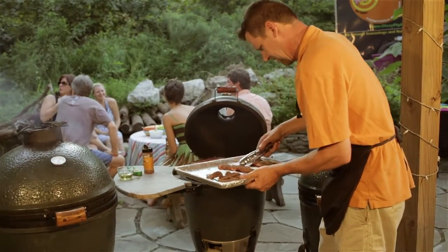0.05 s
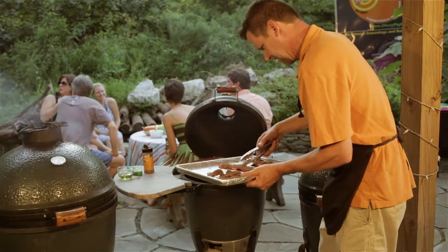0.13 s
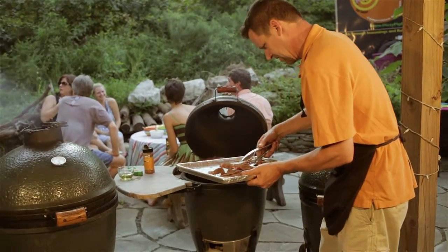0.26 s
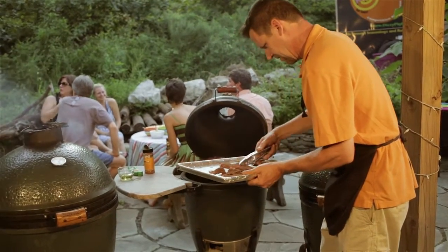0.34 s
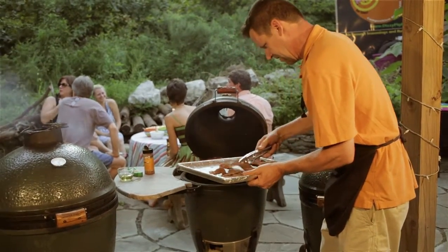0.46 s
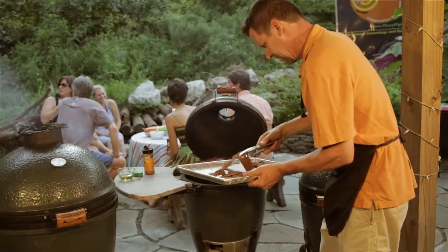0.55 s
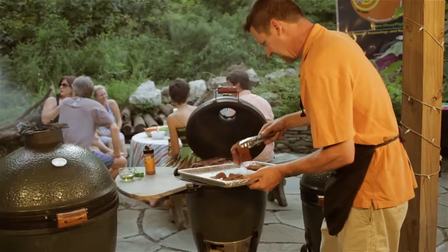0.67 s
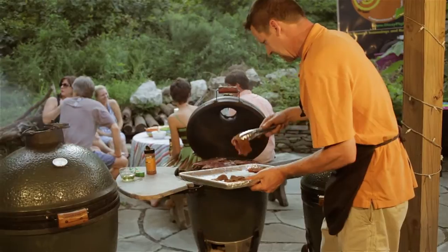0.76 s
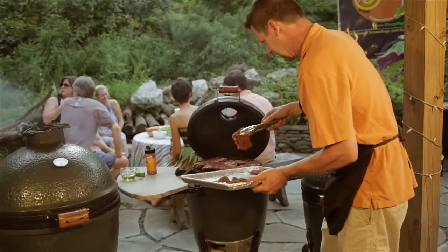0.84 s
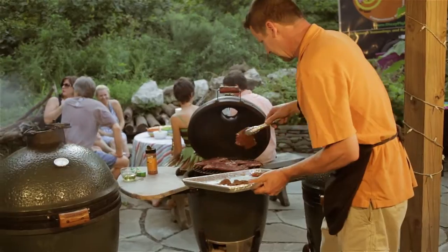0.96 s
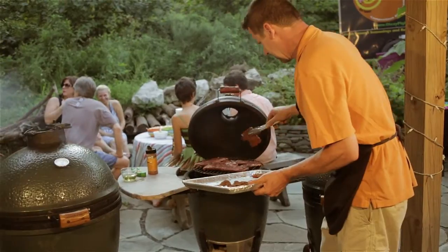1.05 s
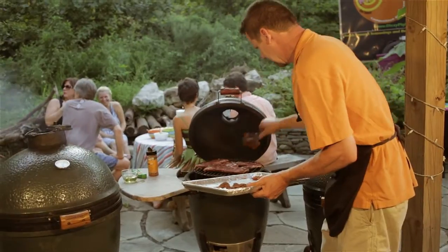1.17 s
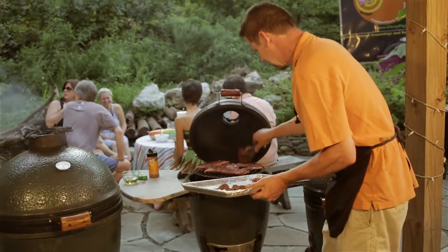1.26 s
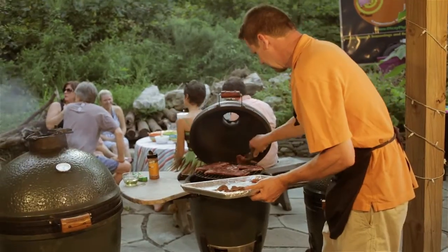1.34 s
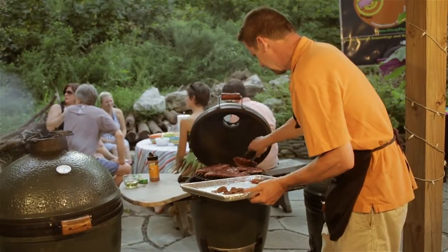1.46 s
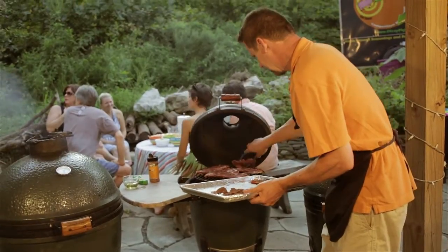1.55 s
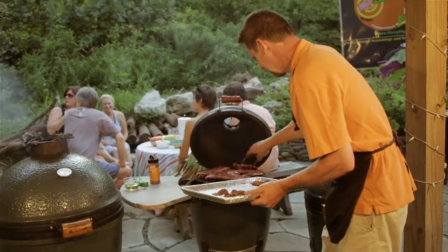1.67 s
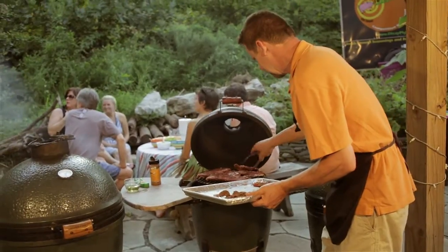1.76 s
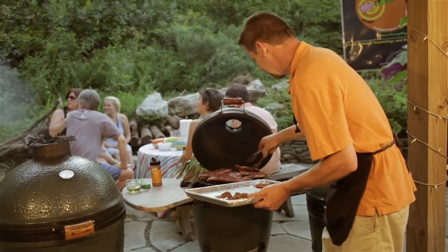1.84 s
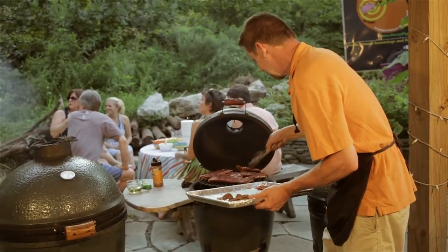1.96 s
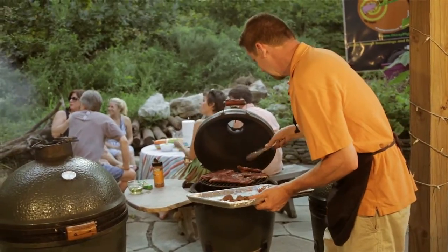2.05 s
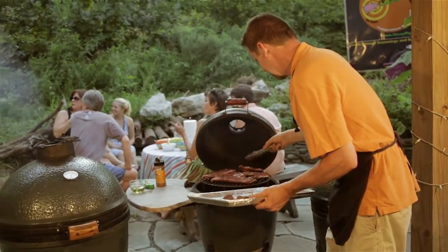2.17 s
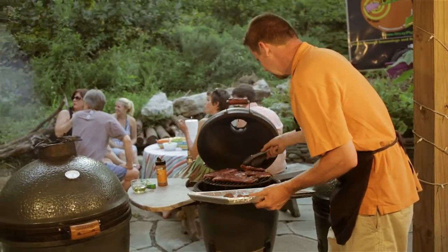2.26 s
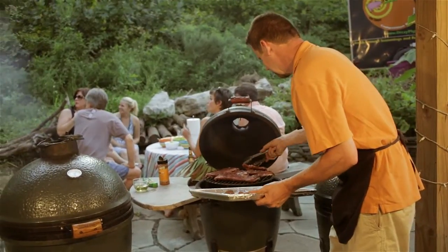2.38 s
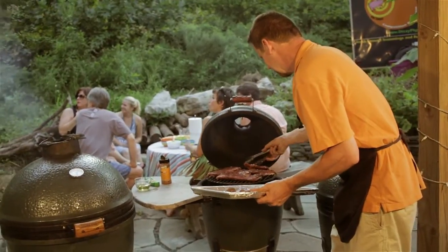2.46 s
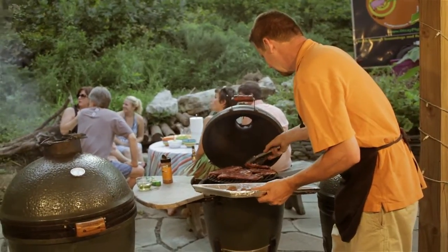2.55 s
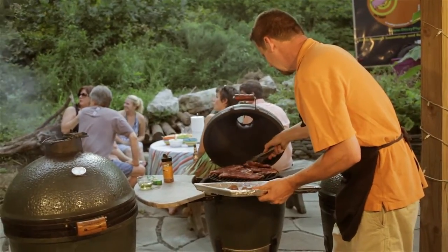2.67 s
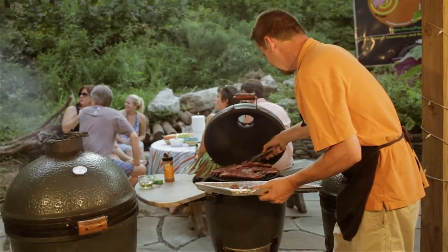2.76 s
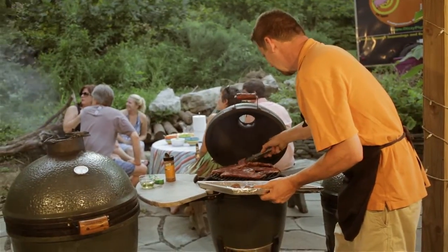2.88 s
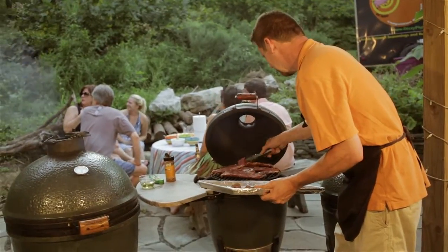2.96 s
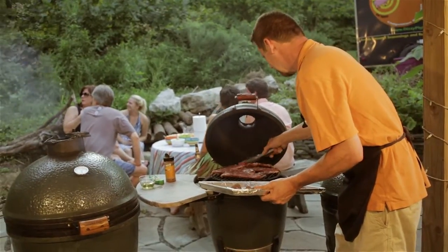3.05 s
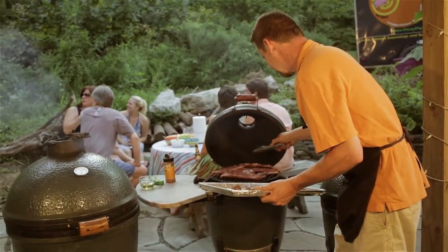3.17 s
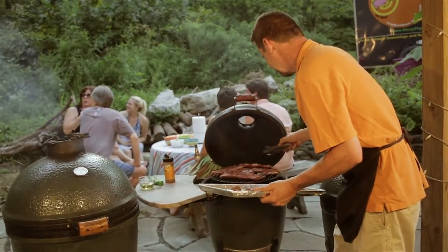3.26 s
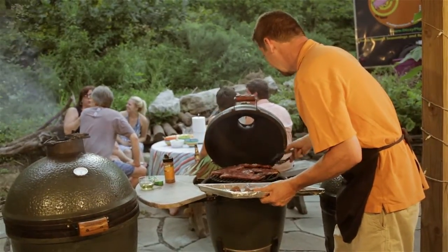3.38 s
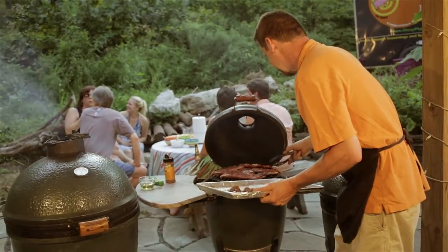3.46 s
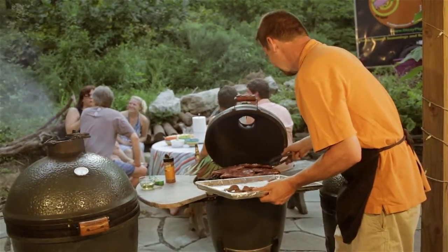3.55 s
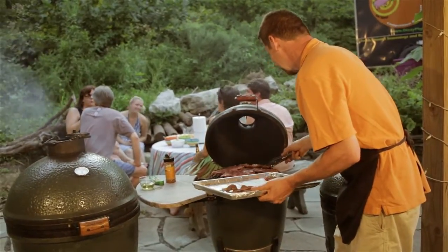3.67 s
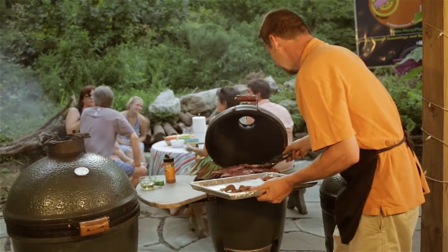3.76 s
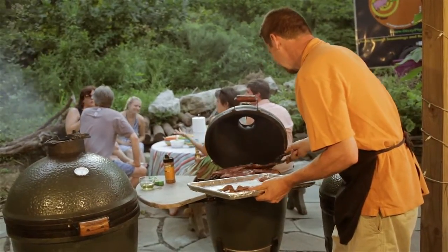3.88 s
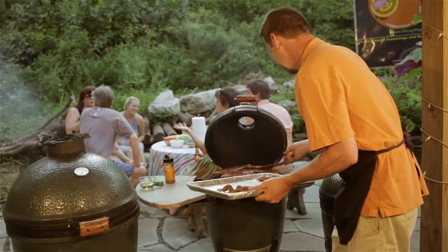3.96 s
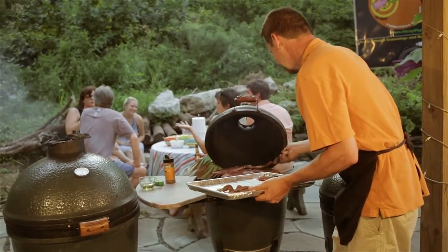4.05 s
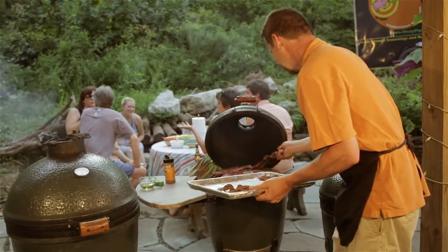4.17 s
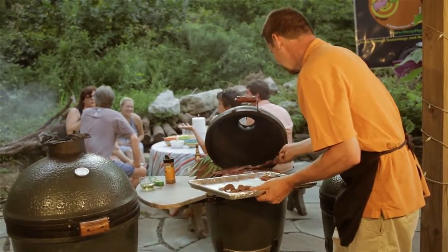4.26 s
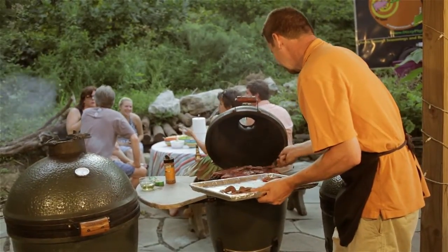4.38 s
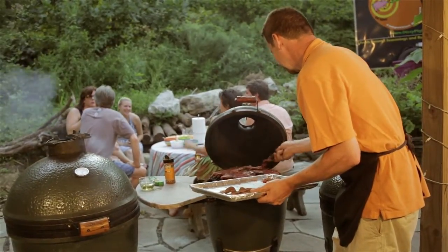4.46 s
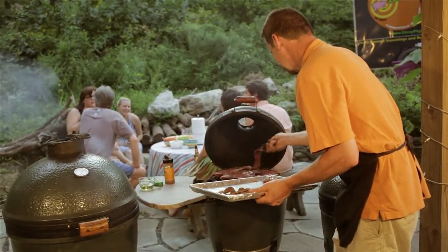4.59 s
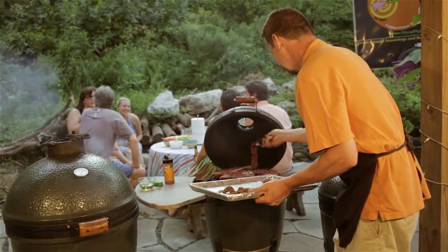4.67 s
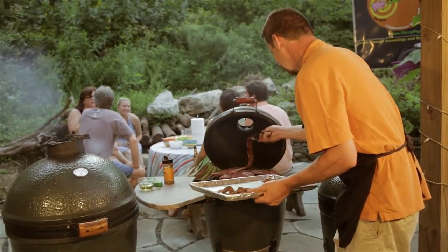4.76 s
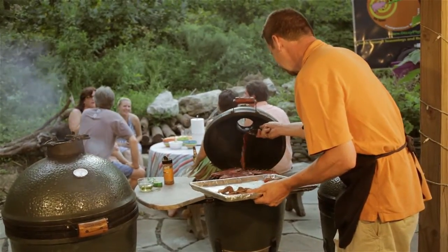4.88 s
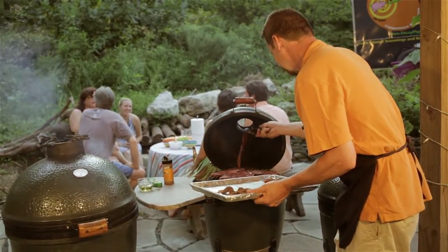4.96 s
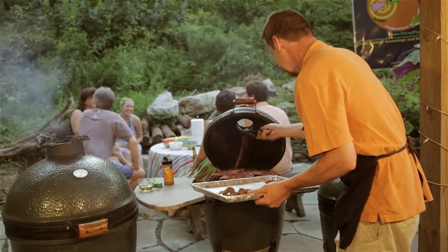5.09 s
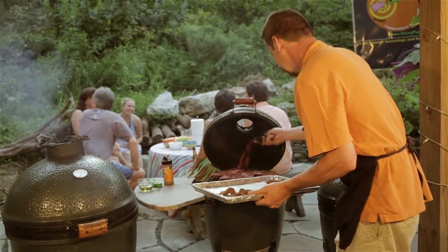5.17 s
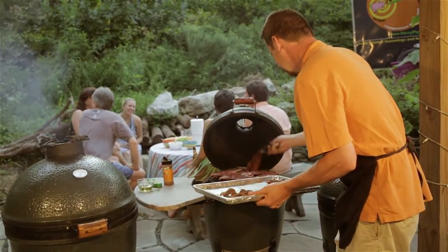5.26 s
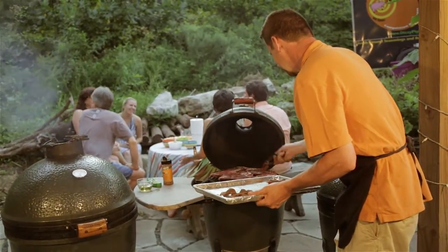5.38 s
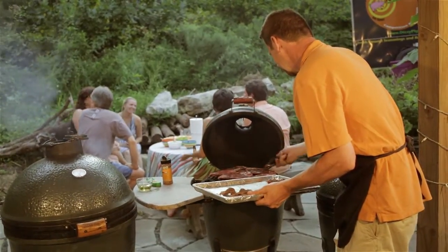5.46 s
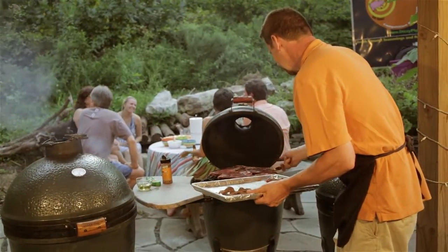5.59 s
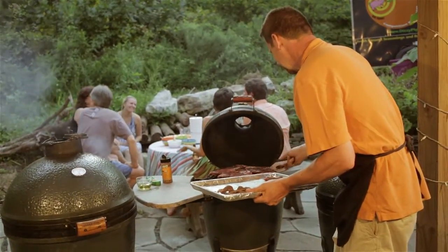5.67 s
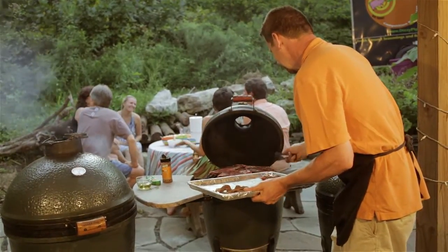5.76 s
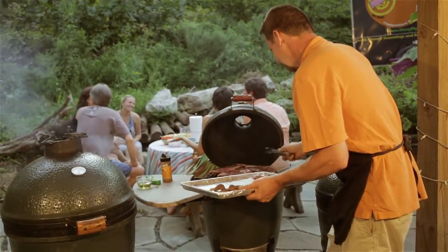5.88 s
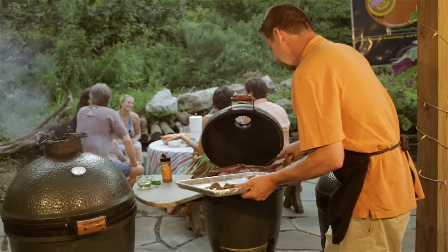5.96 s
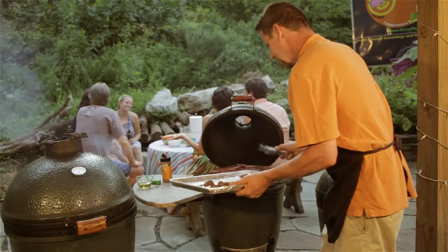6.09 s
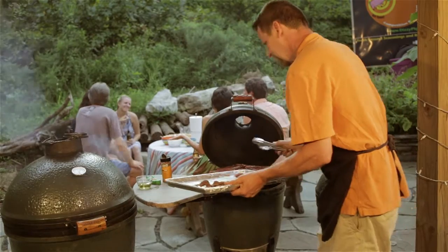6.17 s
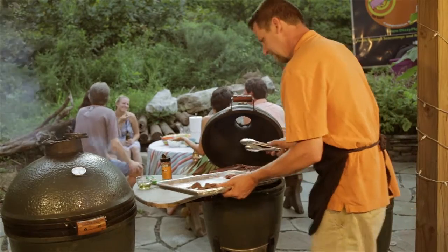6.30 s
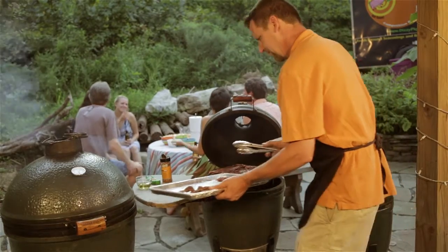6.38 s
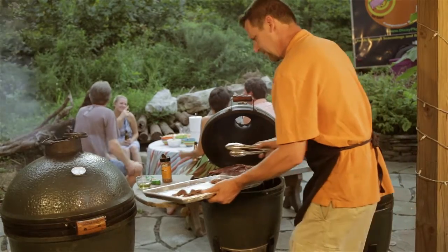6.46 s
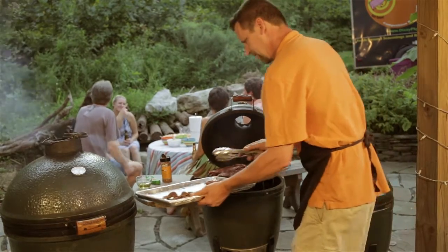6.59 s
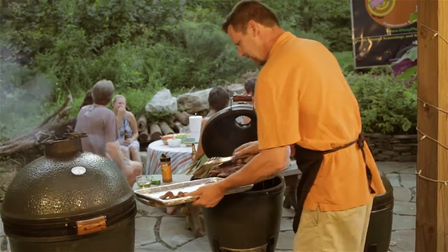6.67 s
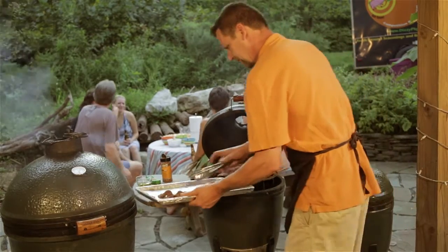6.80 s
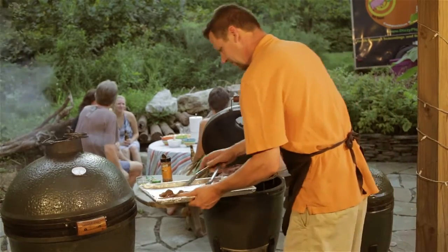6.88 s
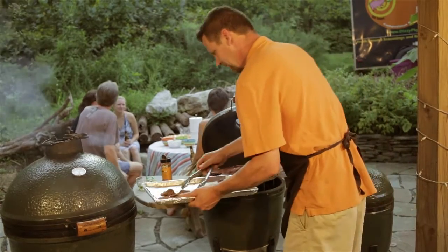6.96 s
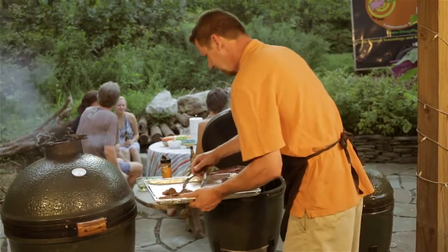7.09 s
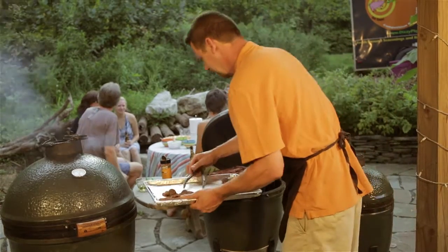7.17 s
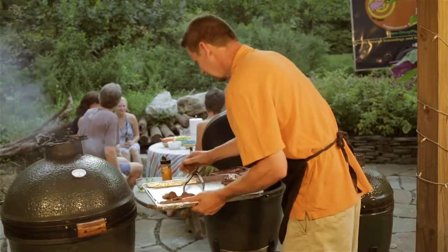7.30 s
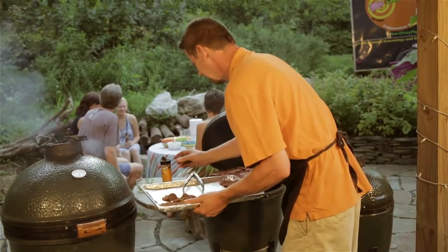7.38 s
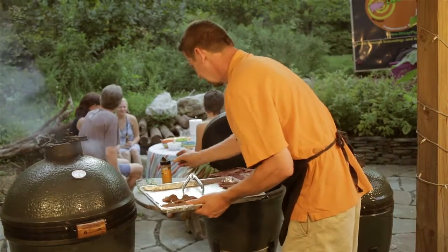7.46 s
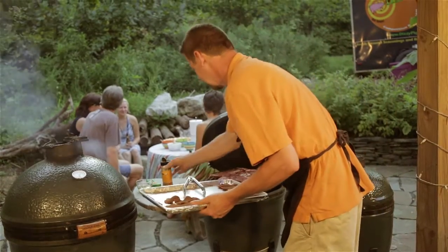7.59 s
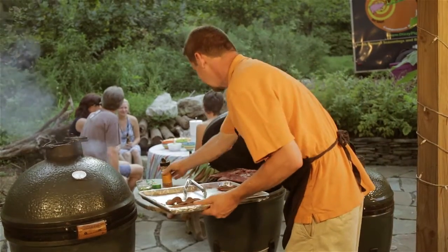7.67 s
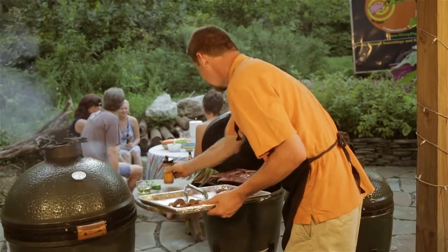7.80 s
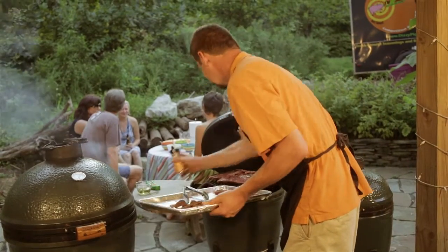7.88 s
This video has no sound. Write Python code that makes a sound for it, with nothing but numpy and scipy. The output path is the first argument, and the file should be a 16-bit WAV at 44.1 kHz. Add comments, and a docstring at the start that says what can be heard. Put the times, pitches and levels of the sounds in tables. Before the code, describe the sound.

At 0.1 s steel tongs strike a sheet tray damped by meat: a short, hollow clack with one quick rebound. From then on meat sizzles softly, a bright hiss with crackle, swelling near 1.6 and 3 s; sharper fat spits pop around 2.2, 2.9, 3.0 and 5.5 s. Between 1.3 and 5 s the tongs and meat touch the grate faintly, with small scuffs and dull hollow bumps, clearest near 1.65 and 2.4 s. A scuffing click at 5.7 s precedes a stronger steel click at 6.0 s. Cloth rustles faintly at 6.65 s, then the tray clatters loudly at 6.9-7.1 s in fast rebounds and again, brighter and ringing, at 7.26-7.35 s. A faint rustle and tap follow at 7.7 s. Quiet garden rumble, insects near 7 kHz and an intermittent breathy whistle near 1.7 kHz lie behind. Close, open-air, mono.

```python
"""Steel tongs hit a meat-damped sheet tray, then click and scuff on a charcoal grill's grate; the tray clatters again.
Tray, tongs, grate and grill hollow are struck banks of decaying sines, with noise bursts for cracks and scuffs.
Meat sizzles and spits: steady noise with random pops, and short noise bursts. A sleeve rustles in noise swells.
Behind lie a low garden rumble of coloured noise, insects trilling in narrow noise bands,
and a thin whistle of resonant noise that comes and goes with hiss around it."""
import sys
import numpy as np
from scipy import signal
from scipy.fft import rfft, irfft, next_fast_len
from scipy.io import wavfile

SR = 44100
rng = np.random.default_rng(int(sys.argv[2]) if len(sys.argv) > 2 else 0)


def store_wav(level_fs):
    """Save 16-bit WAV to argv[1]."""
    pcm = np.round(np.clip(np.atleast_2d(level_fs), -1, 1) * 32767)
    wavfile.write(sys.argv[1], SR, pcm.T.astype(np.int16))


N = 349933  # samples

# Tongs on the tray: start_s [s], tray_db [dB before the spot weighting], spot_hz [pitch the spot favours, Hz],
# spread [octaves], crack_db [dB], ring_db [tong ring, dB], count [rebounds, rounded], gap_s [s between rebounds]
TRAY_BLOWS = [ (0.1096, -9, 461, 0.062, -26, -49.5, 0.5, 0), (6.724, -37, 447, 0.15, -53, -78, 0, 0),
              (6.93, -12.5, 810, 0.27, -23, -41, 2.5, .009),
              (6.972, -14.5, 730, 0.4, -26.5, -52, 5.5, .0101), (7.055, -20, 520, 1.1, -36, -56, 0, 0),
              (7.0787, -18, 600, 0.23, -38, -52, 2.5, .0147), (7.261, -13, 500, 0.36, -21, -28.5, 0.5, 0),
              (7.27, -10.5, 480, 1.5, -12.5, -48.5, 1.5, .0194), (7.297, -20.5, 650, 1.3, -22, -35, 0, 0),
              (7.311, -27, 580, 0.9, -38, -33.5, 3, .0135), (7.756, -39, 278, 0.65, -57, -72, 0.5, 0)]
# Dull colour of the grill's shudder and the garden's scatter: pitch_hz [Hz], level_db [relative dB per Hz]
DULL_COLOUR = [(30, -17), (70, -9), (140, 3), (290, 12), (520, -2), (950, 3.5), (1700, -11), (2600, -37),
               (16000, -50)]
# Bright colour of frying fat: pitch_hz [Hz], level_db [relative dB per Hz]
FRYING_COLOUR = [(300, -3), (2000, -20), (3700, -16), (5200, -4), (6500, -3), (8800, -3), (12000, -1),
                 (14500, -1.5), (16000, -3)]


def from_db(db):
    """Decibels to gain."""
    return 10 ** (np.asarray(db) / 20)


def rms_one(x):
    """Scale to unit power."""
    return x / np.sqrt(np.mean(x ** 2) + 1e-20)


def in_time(rows):
    """Join (time, value) points by straight lines into a control curve at every sample."""
    return np.interp(np.arange(N) / SR, *np.transpose(rows))


def drift(rate_hz):
    """Slow random wandering with rms 1: noise with its faster changes rolled off above the rate."""
    hz = np.arange(N // 2 + 1) * SR / N
    slowed = rfft(rng.standard_normal(N)) / (1 + (hz / rate_hz) ** 2)
    return rms_one(irfft(slowed, N))


def colour(x, spectrum):
    """Give a steady signal a spectrum, drawn over log frequency; rms 1."""
    size = next_fast_len(N)
    hz, db = np.transpose(spectrum)
    bins_hz = np.maximum(np.arange(size // 2 + 1) * SR / size, 1)
    gain = from_db(np.interp(np.log(bins_hz), np.log(hz), db))
    return rms_one(irfft(rfft(x, size) * gain, size)[:N])


def clicks(times, db):
    """One impulse for each contact."""
    out = np.zeros(N)
    np.add.at(out, np.round(times * SR).astype(int), from_db(db))
    return out


def ring(drive, hz, t60):
    """A two-pole resonator: a unit click sets a sine of height 1 ringing, down 60 dB after t60 seconds."""
    radius = from_db(-60 / (t60 * SR))
    angle = 2 * np.pi * hz / SR
    # the tiny offset keeps the dying filter state from becoming vanishingly small
    return signal.lfilter([0, np.sin(angle)], [1, -2 * radius * np.cos(angle), radius ** 2], drive + 1e-18)


def fade(drive, t60):
    """An envelope that jumps at each click and dies away by 60 dB in t60 seconds."""
    return signal.lfilter([1], [1, -from_db(-60 / (t60 * SR))], drive + 1e-18)


def burst(drive, spectrum, t60, tail_db, tail_t60, rise_t60=0.0011):
    """A crowd of unresolved modes, as noise: a quick crack and a weaker, longer tail."""
    envelope = fade(drive, t60) + from_db(tail_db) * fade(drive, tail_t60)
    envelope = envelope - fade(drive, rise_t60)  # softens the onset
    return envelope * colour(rng.standard_normal(N), spectrum)


def steel(times, db, modes, longest_t60, contrast, vary_db=2.5):
    """Each touch strikes every mode with its own strength; long rings are cut to a longest decay."""
    out = np.zeros(N)
    for k, (hz, mode_db, t60) in enumerate(modes):
        strength_db = db + contrast * mode_db + vary_db * rng.standard_normal(len(times))
        polarity = (-1) ** k
        out += polarity * ring(clicks(times, strength_db), hz, min(t60, longest_t60))
    return out


def garden():
    """Steady noise, heaviest in the bass, makes the low outdoor rumble."""
    # outdoor colour: pitch_hz [Hz], level_db [relative dB per Hz]
    outdoor_colour = [(20, -24), (45, -5), (75, 2), (105, 4), (150, -3.5), (250, -4.5), (380, -7),
                      (520, -2.5), (900, -9.5), (1400, -15), (1750, -17), (2200, -17), (3600, -23),
                      (6000, -23.5), (16000, -22.5)]
    return from_db(-58.98) * colour(rng.standard_normal(N), outdoor_colour)


def insects(level_db=-59.5, throb_db=1.4):
    """Many far wings rasp near one pitch and blur into a narrow, throbbing band."""
    # voices of the chorus: pitch_hz [Hz], width_hz [each resonator's bandwidth, Hz], level_db [relative dB]
    trill_voices = [(6964, 270, -3), (7184, 150, -1), (7360, 530, -5.5)]
    chorus = 0
    for hz, width_hz, db in trill_voices:
        t60 = np.log(1000) / (np.pi * width_hz)  # a narrower band rings longer
        voice = ring(ring(rng.standard_normal(N), hz, t60), hz, t60)
        chorus = chorus + from_db(db) * rms_one(voice)
    return rms_one(chorus) * from_db(level_db + throb_db * drift(8))


def whistle(waver_db=1.8, width_hz=140):
    """Noise in one narrow resonance, with hiss around it; each spell swells, fades slowly and stops."""
    # spells: start_s [s], length_s [s before the release], pitch_hz [Hz],
    # tone_db and hiss_db [dB before the swell and fade]
    whistle_spells = [(0.1, 0.98, 1767, -63, -53.5), (1.19, 0.55, 1780, -73, -69),
                      (2.38, 1.2, 1688, -67.5, -66), (3.724, 0.41, 1710, -71.5, -71),
                      (4.254, 0.77, 1756, -68, -63), (5.93, .95, 1667, -62.5, -58),
                      (7.262, 0.66, 1686, -64.5, -57.5)]
    # colour of the hiss: pitch_hz [Hz], level_db [relative dB per Hz]
    hiss_colour = [(100, -1.5), (350, 4), (600, 2.5), (850, 2.5), (1080, -2.5), (1270, 0.5), (1480, -12.5),
                   (2150, -3), (2650, -8.5), (3150, -4), (3800, -12.5), (5200, -8.5), (6150, -5),
                   (8000, -27), (16000, -36)]
    attack_s, release_s = 0.14, 0.098
    tone_fade, hiss_fade = 6, 9.5  # dB per second
    t = np.arange(N) / SR
    t60 = np.log(1000) / (np.pi * width_hz)
    noise, tone, hiss_gain = rng.standard_normal(N), 0, 0
    for start_s, length_s, hz, tone_db, hiss_db in whistle_spells:
        age = np.maximum(t - start_s, 0)
        gate = np.minimum(age / attack_s, 1) * np.clip(1 - (age - length_s) / release_s, 0, 1)
        resonance = rms_one(ring(ring(noise, hz, t60), hz, t60))
        tone = tone + gate * from_db(tone_db - tone_fade * age) * resonance
        hiss_gain = hiss_gain + gate * from_db(hiss_db - hiss_fade * age)
    hiss = hiss_gain * colour(rng.standard_normal(N), hiss_colour)
    return tone * from_db(waver_db * drift(16)) + hiss


def sleeve(grain_db=2.5):
    """The cook's sleeve brushes past: cloth slides in short, grainy swells of noise."""
    # brushes: centre_s [s], half_s [bell-curve spread, s], level_db [dB at the peak, before the grain]
    sleeve_brushes = [(6.645, 0.032, -54.5), (7.197, 0.0067, -55.5), (7.723, 0.049, -58)]
    # colour of the cloth: pitch_hz [Hz], level_db [relative dB per Hz]
    cloth_colour = [(200, -6), (900, 2), (1500, -2), (2400, -1), (3700, -4), (5000, -12), (9000, -5),
                    (16000, -15)]
    t = np.arange(N) / SR
    swell = sum(from_db(db) * np.exp(-((t - centre_s) / half_s) ** 2 / 2)
                for centre_s, half_s, db in sleeve_brushes)
    grain = from_db(grain_db * drift(120))
    return swell * grain * colour(rng.standard_normal(N), cloth_colour)


def sizzle(pops_per_s=900, size_db=4.5, pop_share_db=-6, flutter_db=0.97):
    """Countless tiny steam bursts make a hiss; larger ones stand out as crackle and spits."""
    # heat of the frying: time_s [s], heat_db [dB, the reference for both sizzle and small spits]
    frying_heat = [(0.0, -59.5), (1.04, -61.5), (1.61, -55.5), (2.14, -59.5), (2.98, -55.5), (3.22, -59),
                   (3.6, -58.5), (4.13, -61.5), (5.19, -62), (5.46, -58), (6.03, -61.5), (6.45, -60),
                   (6.89, -62.5), (7.2, -57), (7.44, -65), (7.93, -66.5)]
    # the loudest spits of fat: start_s [s], level_db [dB]
    loud_spits = [(2.175, -45), (2.853, -44), (3.029, -45), (5.482, -44)]
    sizzle_over_heat_db = 3.5
    small_spits_per_s, small_spit_over_heat_db = 1.2, 4
    sizes = from_db(size_db * np.minimum(rng.exponential(1, N), 4.5)) * rng.choice([-1, 1], N)
    pops = sizes * (rng.random(N) < pops_per_s / SR)
    frying = colour(rng.standard_normal(N) + from_db(pop_share_db) * rms_one(pops), FRYING_COLOUR)
    heat_db = in_time(frying_heat)
    small = (rng.random(N) < small_spits_per_s / SR) * from_db(heat_db + small_spit_over_heat_db)
    spit_clicks = clicks(*np.transpose(loud_spits)) + small
    spits = burst(spit_clicks, FRYING_COLOUR, t60=0.0057, tail_db=-1.5, tail_t60=0.03)
    return frying * from_db(heat_db + sizzle_over_heat_db + flutter_db * drift(25)) + spits


def light_touches(click_db=-9, boom_db=-13):
    """Ten faint contacts scattered over the arranging of the meat, in the columns of the grate touches."""
    times = rng.uniform(1.3, 6.6, size=10)  # seconds
    scuff_db = -58.5 + 2 * rng.standard_normal(len(times))
    return np.column_stack([times, scuff_db + click_db, scuff_db, scuff_db + boom_db])


def grill(answer_s=0.0055):
    """A touch on the grate clicks at once; the bowl and its open lid answer a moment later."""
    # tongs and meat on the grate: start_s [s], click_db [steel, dB], scuff_db [dB], boom_db [hollow, dB]
    grate_touches = [ (1.357, -68, -68, -52), (1.646, -56, -48, -43), (1.702, -66, -53, -51),
                     (2.408, -53, -41.5, -41.5), (2.485, -63, -49, -47), (2.688, -55, -58, -64),
                     (3.523, -54, -48.5, -53), (3.938, -75, -75, -50), (4.596, -72, -54.5, -56.5),
                     (5.055, -68, -55, -70), (5.658, -38.5, -40.5, -52.5), (6.0115, -26.5, -28.5, -36.5)]
    # steel tips against the grate: pitch_hz [Hz], level_db [dB before contrast], t60_s [s before the cap]
    grate_modes = [(4540, -7.5, 0.093), (5150, -7, 0.078), (5190, -7.5, 0.27), (5470, 0, 0.053),
                   (6660, -17, 0.076), (6320, -4, 0.03), (7100, -3, 0.033), (8650, -14, 0.17),
                   (10800, -36, 0.15), (11900, -34, 0.073), (12020, -36, 0.095), (12650, -11, 0.1),
                   (13090, -31, 0.058), (13320, -38, 0.068), (14100, -25, 0.12), (14080, -38, 0.11),
                   (15470, -15, 0.076)]
    # the air and shell of the grill: pitch_hz [Hz], level_db [relative dB], t60_s [s before the cap]
    hollow_modes = [(79.4, -4, 0.067), (159, -12.5, 0.21), (202, -6.5, 0.082), (249, -3.5, 0.27),
                    (283, 0.5, 0.24), (305, 0.5, 0.055), (423, -8.5, 0.21), (567, -8.5, 0.023),
                    (630, -9.5, 0.12), (885, -11.5, 0.25), (950, -22, 0.13), (1250, -12, 0.08),
                    (1644, -13.5, 0.16), (2350, -13, 0.043)]
    # colour of the scuffs: pitch_hz [Hz], level_db [relative dB per Hz]
    scuff_colour = [(100, 2), (400, 10), (1200, 6), (2200, 4), (3700, 5.7), (5200, 9.8), (8000, 7.1),
                    (16000, 0.91)]
    times, click_db, scuff_db, boom_db = np.vstack([grate_touches, light_touches()]).T
    click = steel(times, click_db, grate_modes, longest_t60=0.041, contrast=0.77)
    scuff = burst(clicks(times, scuff_db), scuff_colour, t60=0.026, tail_db=-8, tail_t60=0.11)
    boom = steel(times + answer_s, boom_db, hollow_modes, longest_t60=0.18, contrast=1.0)
    # the grate and coals shudder too
    shudder = burst(clicks(times, boom_db - 2.5), DULL_COLOUR,
                    t60=0.07, tail_db=-15, tail_t60=0.28, rise_t60=0.008)
    return click + scuff + boom + shudder


def bounces():
    """Every blow on the tray with its evenly spaced rebounds; the first loses most, later ones ever less."""
    tray_loss_db, crack_loss_db, ring_loss_db = -9.5, -14, -12.5  # at the first rebound; the crack goes fastest
    easing = 0.57
    rows = []
    for start_s, tray_db, spot_hz, spread, crack_db, ring_db, count, gap_s in TRAY_BLOWS:
        for k in range(round(count) + 1):
            loss = k ** easing
            rows.append((start_s + k * gap_s, tray_db + loss * tray_loss_db, spot_hz, spread,
                         crack_db + loss * crack_loss_db, ring_db + loss * ring_loss_db))
    return rows


def flex(delay_s=0.0056, level_db=-23):
    """Blows that rebound also bend the hand-held tray, which swings back a moment later with a low thump."""
    # bending of the whole tray: pitch_hz [Hz], level_db [relative dB], t60_s [s]
    flex_modes = [(111.4, -1.5, 0.11), (185, -5.5, 0.068), (275, -3, 0.037)]
    rebounding = [(start_s, tray_db) for start_s, tray_db, *_, count, gap_s in TRAY_BLOWS if round(count)]
    times, tray_db = np.transpose(rebounding)
    return sum(ring(clicks(times + delay_s, tray_db + level_db + mode_db), hz, t60)
               for hz, mode_db, t60 in flex_modes)


def tray(contact_hz=2600, radiation_hz=130, arm_mismatch=0.019):
    """The spot that is struck favours some of the sheet's modes; the tong arms ring on above them."""
    # the loaded sheet: pitch_hz [Hz], level_db [dB before spot weighting and band-pass], t60_s [s]
    sheet_modes = [(122, -13, 0.084), (151, -10.5, 0.077), (217, -18.5, 0.13), (285, -14, 0.058),
                   (473, -5.5, 0.069), (530, -36, 0.092), (559, -4.5, 0.046), (710, -35, 0.028),
                   (715, -6.5, 0.036), (818, -25, 0.1), (1254, -15, 0.041), (1603, -9, 0.023),
                   (1775, -24, 0.11), (1860, -26, 0.099), (1990, -39, 0.059), (2290, -18, 0.077)]
    # tong arms: pitch_hz [Hz], level_db [relative dB], t60_s [s before the cap]
    tong_modes = [(3040, -12, 0.053), (3300, -7, 0.16), (3800, -16, 0.24), (4200, -8, 0.055),
                  (4350, -2, 0.032), (4340, 8.5, 0.03), (4950, -12.5, 0.09), (5360, -10, 0.12),
                  (5240, 1, 0.084), (5900, -5, 0.045), (5460, -12, 0.11), (6000, -17, 0.16),
                  (6400, -2, 0.16), (7170, -6.5, 0.057), (8230, -12, 0.077), (8550, -7.5, 0.12),
                  (8830, -13, 0.15), (9890, -11, 0.25), (11350, -16, 0.17), (11470, -19, 0.22),
                  (12700, -20, .18)]
    # colour of the impact crack: pitch_hz [Hz], level_db [relative dB per Hz]
    crack_colour = [(100, -30), (350, 8), (600, 14), (900, 9.5), (1200, -1), (1700, 7), (3000, 1),
                    (4400, 0.5), (5600, 3.5), (7500, -6), (11000, -7.5), (16000, -16)]
    times, tray_db, spot_hz, spread, crack_db, ring_db = np.transpose(bounces())
    sheet = np.zeros(N)
    for hz, mode_db, t60 in sheet_modes:
        off_spot = np.log2(hz / spot_hz) / spread
        spot_loss_db = 10 * np.log10(1 + off_spot ** 4)
        sheet += ring(clicks(times, tray_db + mode_db - spot_loss_db), hz, t60)
    # contact takes time, and an open sheet radiates little bass
    band = signal.butter(2, [radiation_hz, contact_hz], "band", fs=SR, output="sos")
    sheet = signal.sosfilt(band, sheet)
    crack = burst(clicks(times, crack_db), crack_colour, t60=0.022, tail_db=-22.0, tail_t60=0.15)
    # the two arms are nearly alike, so their modes come in close pairs
    other_arm = np.array(tong_modes) * [1 + arm_mismatch, 1, 1]
    arms = steel(times, ring_db, tong_modes, longest_t60=0.12, contrast=1.0)
    arms += steel(times, ring_db - 7.5, other_arm, longest_t60=0.096, contrast=1.0)
    # the loose hinge buzzes and roughens their ring
    buzz = from_db(2.1 * drift(320))
    # paving and furniture scatter a faint, dull tail
    scatter = burst(clicks(times, tray_db - 34.5), DULL_COLOUR,
                    t60=0.16, tail_db=-24, tail_t60=0.44, rise_t60=0.012)
    return sheet + flex() + crack + buzz * arms + scatter


def scene():
    """Tongs and sizzle close by in the open air, the garden behind; one channel."""
    background = garden() + insects() + whistle()
    return (background + sleeve() + sizzle() + grill() + tray())[None]


def record(dry):
    """A steep elliptic low-pass cuts the top above 15.8 kHz."""
    low_pass = signal.ellip(12, 0.1, 80, 15800, fs=SR, output="sos")
    return signal.sosfilt(low_pass, dry)


dry = scene()
out = record(dry)
store_wav(out)
```